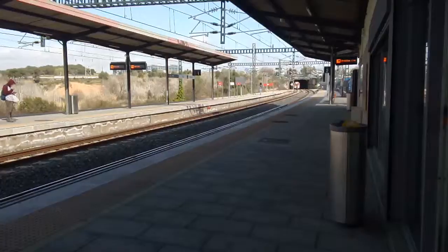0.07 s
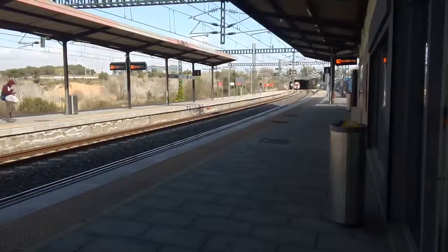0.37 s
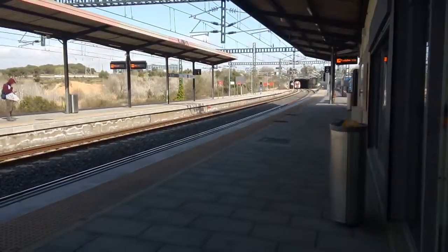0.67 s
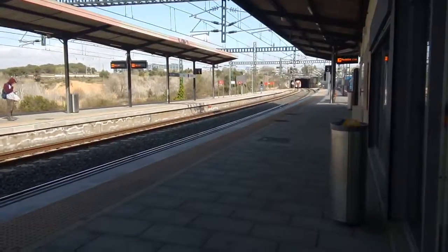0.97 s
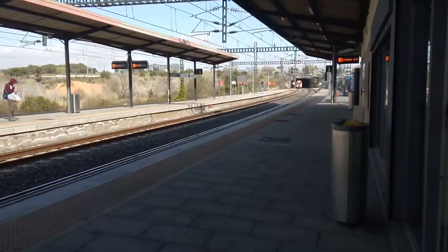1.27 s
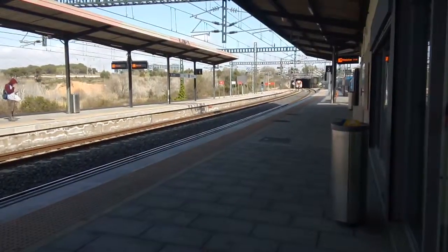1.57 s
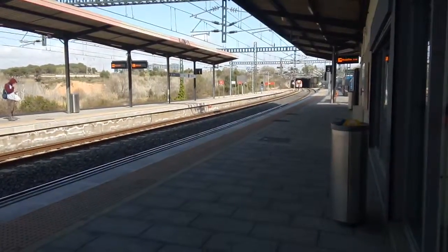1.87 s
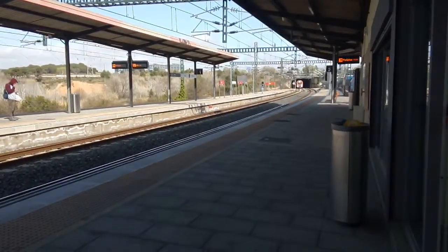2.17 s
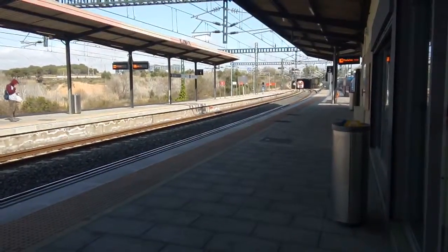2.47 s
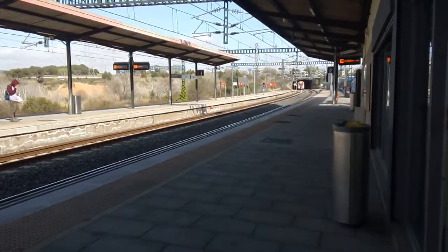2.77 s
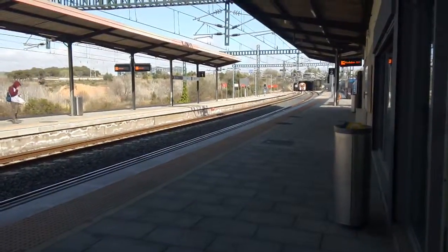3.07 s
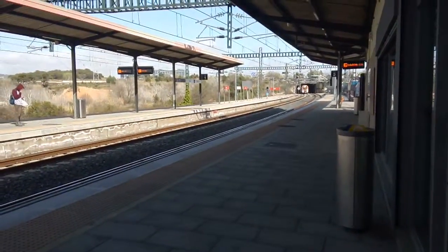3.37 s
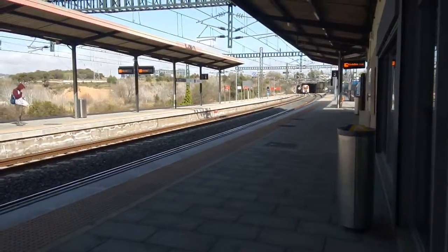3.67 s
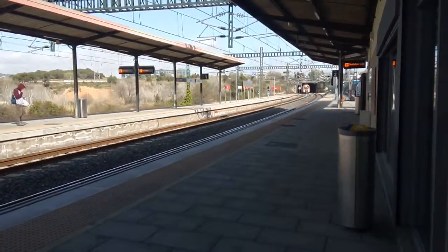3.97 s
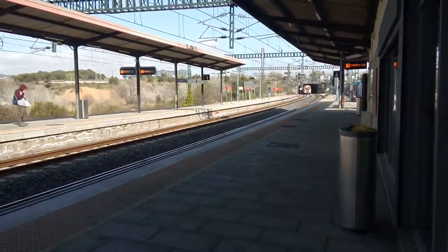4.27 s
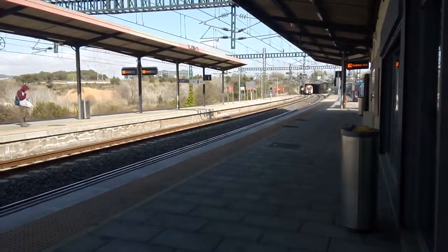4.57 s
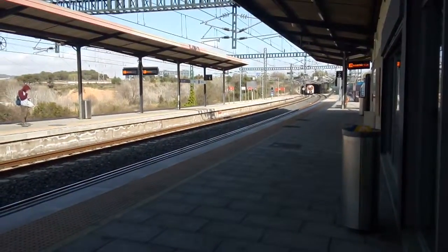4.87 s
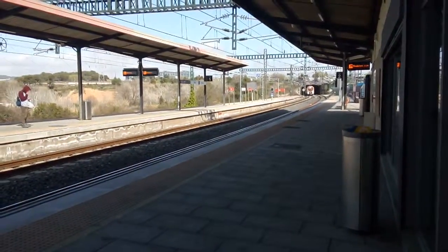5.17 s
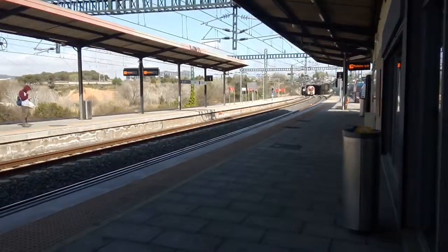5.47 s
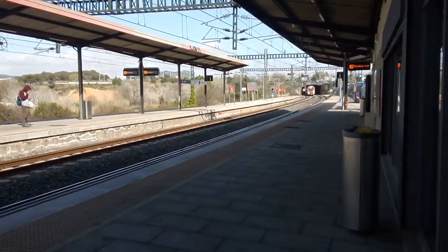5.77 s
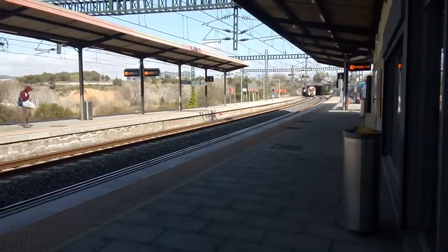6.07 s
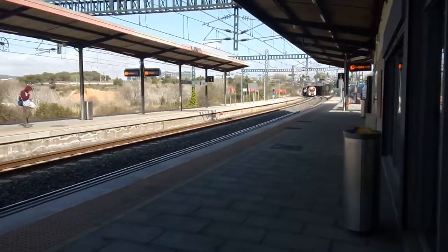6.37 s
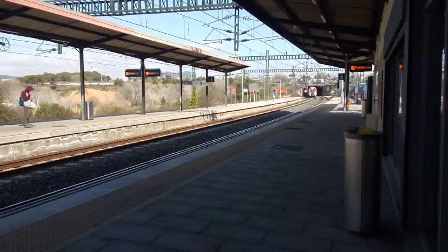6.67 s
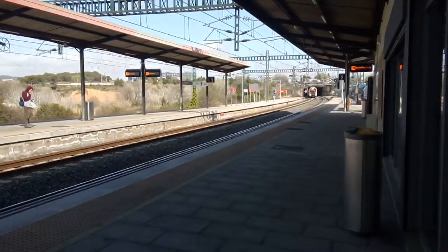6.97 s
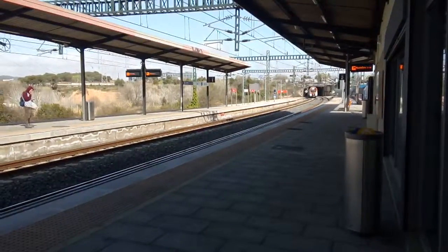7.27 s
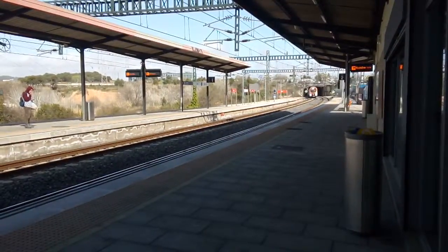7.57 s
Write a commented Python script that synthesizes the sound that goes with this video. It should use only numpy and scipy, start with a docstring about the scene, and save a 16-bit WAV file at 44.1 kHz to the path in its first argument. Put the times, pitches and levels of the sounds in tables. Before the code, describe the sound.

A distant electric commuter train rolls toward an open-air station, heard from the platform. The rails sing and hiss over a low rumble, with a faint high sizzle and a thin whistle that comes and goes. A low drone dies away early. Then the wheels strike a rail joint in small rhythmic groups, each knock arriving as a falling metallic pew that echoes briefly under the canopy and grows louder toward the end.

```python
"""Distant train nearing a platform

An electric commuter train rolls toward an open station. Its wheels strike a rail joint; each knock
runs ahead along the steel, treble first, and arrives as a falling "pew" that echoes under the canopy.
The rails sing, hiss and sizzle over a low rumble. A drone dies away; a thin whistle comes and goes."""
import sys
import numpy as np
from scipy import signal
from scipy.fft import rfft, irfft, next_fast_len
from scipy.io import wavfile
from scipy.ndimage import uniform_filter1d

SR = 44100
rng = np.random.default_rng(int(sys.argv[2]) if len(sys.argv) > 2 else 0)


def dump_mix(stems):
    """Bounce the given channels to the path in sys.argv[1] as a 16-bit WAV at rate SR."""
    frames = np.atleast_2d(stems).T  # one column per channel
    limited = np.clip(frames, -1, 1)  # hard clip at full scale
    pcm = np.round(limited * 32767).astype(np.int16)
    wavfile.write(sys.argv[1], SR, pcm)


N = 335601
TIME = np.arange(N) / SR
FREQ = np.maximum(np.fft.rfftfreq(N, 1 / SR), 1)

# Resonances of the rail on its sleepers. Each row: centre in Hz, width in Hz, strength in dB.
RAIL_RESONANCES = [(361, 17, -3), (411, 15, -0.5), (487, 20, 0.5), (601, 29, -4.5), (736, 13, -12.5),
                   (893, 19, -3.5), (1020, 19, -12), (1080, 8.6, -11), (1349, 8.1, 2)]


def from_db(db):
    """Decibels to gain."""
    return 10 ** (np.asarray(db) / 20)


def unit_rms(x):
    """Scale to unit power."""
    return x / np.sqrt(np.mean(x ** 2) + 1e-20)


def curve(rows):
    """Rows of (seconds, value), interpolated to every sample."""
    return np.interp(TIME, *np.transpose(rows))


def colour(points, freq):
    """Gain from rows of (Hz, dB), joined on a log-frequency axis."""
    hz, db = np.transpose(points)
    return from_db(np.interp(np.log(freq), np.log(hz), db))


def rolloff(ratio, order):
    """Low-pass gain for ratio = freq / corner; high-pass for its inverse."""
    return 1 / (1 + ratio ** order)


def resonances(modes, freq):
    """Flat response plus ringing modes."""
    return 1 + sum(from_db(db) / (1 + 2j * (freq - hz) / width_hz) for hz, width_hz, db in modes)


def noise(response):
    """Unit-power noise with the given frequency response."""
    size = next_fast_len(N)
    gain = np.interp(np.fft.rfftfreq(size, 1 / SR), FREQ, np.abs(response))
    return unit_rms(irfft(rfft(rng.standard_normal(size)) * gain, size)[:N])


def drift(rate_hz, size=2048):
    """Smooth random wander of spread 1, mostly below rate_hz."""
    freq = np.fft.rfftfreq(size, N / SR / size)
    slow = irfft(rfft(rng.standard_normal(size)) * rolloff(freq / rate_hz, 2), size)
    return np.interp(TIME, np.linspace(0, N / SR, size), unit_rms(slow))


def nearing(start_db, db_per_s):
    """Level in dB, rising as the train nears."""
    return start_db + db_per_s * TIME


def swell(at_s, half_s, db):
    """Bell-shaped boost in dB."""
    return db * np.exp(-((TIME - at_s) / half_s) ** 2)


def flicker(x, depth_db, size=1024):
    """Small patches of the spectrum swell and sink, more deeply in the treble; unit power."""
    freq, _, spectrum = signal.stft(x, SR, nperseg=size)
    patches = uniform_filter1d(rng.standard_normal(spectrum.shape), size=3, axis=0)
    patches = unit_rms(uniform_filter1d(patches, size=4, axis=1))
    spread_db = depth_db * np.clip(freq / 4500, 0, 1)[:, None]
    _, flickering = signal.istft(spectrum * from_db(spread_db * patches), nperseg=size)
    return unit_rms(flickering[:N])


def ringing_noise(modes, flicker_db):
    """Flickering noise in a few resonances; unit power."""
    power = sum(from_db(2 * db) / (1 + ((FREQ - hz) / width_hz * 1.3) ** 2) ** 4
                for hz, width_hz, db in modes)
    return flicker(noise(np.sqrt(power)), flicker_db)


def rail_singing(flutter_db):
    """Rough wheel treads keep the rails singing in their pass band, with one swell."""
    # Rolling noise carried ahead. Each row: frequency in Hz, relative density in dB.
    spectrum = [(300, -9), (540, -5.5), (610, -0.5), (900, -1), (1080, 0.5), (1220, -1.5), (1345, 0),
                (1400, -16.5), (1700, -28.5)]
    band = colour(spectrum, FREQ) * rolloff(250 / FREQ, 4) * rolloff(FREQ / 2000, 6)
    singing = noise(band * resonances(RAIL_RESONANCES, FREQ))
    level_db = nearing(start_db=-51, db_per_s=0.35) + swell(at_s=1.07, half_s=0.23, db=3.6)
    return singing * from_db(level_db + flutter_db * drift(4.4))


def rail_hiss(flicker_db):
    """Broad hiss of rails and open air, slowly growing."""
    # Each row: frequency in Hz, relative density in dB.
    spectrum = [(300, 1), (1450, 0.5), (1720, 1.5), (1810, 4), (2100, -0.5), (2700, -2.5), (2870, -6.5),
                (3350, -6.5), (3750, -12), (4800, -17), (5100, -18.5), (5700, -25.5), (6100, -33),
                (7300, -50.5)]
    hiss = noise(colour(spectrum, FREQ) * rolloff(250 / FREQ, 4) * rolloff(FREQ / 8000, 12))
    return flicker(hiss, flicker_db) * from_db(nearing(start_db=-51.5, db_per_s=0.38))


def rail_sizzle():
    """High steel resonances grow as the wheels near; the shimmer above them flares twice."""
    # Two sets of resonances. Each row: centre in Hz, width in Hz, relative level in dB.
    steel_modes = [(4780, 330, -8), (5270, 100, 1), (5445, 120, 1), (5584, 150, 2), (5744, 150, -1)]
    shimmer_modes = [(5830, 290, 3), (6020, 290, 0), (6280, 160, -7), (6400, 230, -7.5), (6870, 450, -13.5)]
    # Envelope of the steel modes. Each row: time in seconds, level in dB.
    steel_levels = [(.3, -77), (1.4, -73), (2.2, -75.5), (2.4, -71), (3.5, -71.5), (7.6, -68)]
    steel = from_db(curve(steel_levels)) * ringing_noise(steel_modes, flicker_db=2.5)
    flares_db = swell(at_s=2.335, half_s=0.03, db=9) + swell(at_s=3.13, half_s=0.06, db=7.5)
    shimmer_db = nearing(start_db=-82.5, db_per_s=0.1) + flares_db
    return steel + from_db(shimmer_db) * ringing_noise(shimmer_modes, flicker_db=4.5)


def rumble(split_hz, deep_flutter_db, upper_gain_db):
    """Airborne roar of train and surroundings: a nearly steady deep part, a wavering upper part."""
    # Each row: frequency in Hz, relative density in dB.
    spectrum = [(20, -27), (30, -18.5), (38, -19.5), (50, -11.5), (68, 2), (84, -2), (101, 0), (118, -1.5),
                (145, 0), (175, -3), (210, -5), (255, -11.5), (300, -13), (450, -25), (900, -36.5)]
    # Upper part, wavering at random. Each row: time in seconds, level in dB before upper_gain_db.
    upper_levels = [(0.35, -53.5), (1.05, -57.5), (1.18, -50.5), (1.82, -55.5), (2.15, -48.5),
                    (2.21, -54.5), (2.45, -51.5), (3.8, -48), (5.11, -51.5), (5.38, -49), (7.6, -51)]
    shape = colour(spectrum, FREQ) * rolloff(FREQ / 1000, 4)
    deep_share = rolloff(FREQ / split_hz, 8)
    deep_db = nearing(start_db=-54.5, db_per_s=0.14) + deep_flutter_db * drift(1.9)
    deep = from_db(deep_db) * noise(shape * np.sqrt(deep_share))
    upper = from_db(curve(upper_levels) + upper_gain_db) * noise(shape * np.sqrt(1 - deep_share))
    return deep + upper


def drone(level_db, hold_s, release_db_per_s, waver, flutter_db):
    """Low, slightly unsteady tones hold, then sink into the rumble."""
    # Each row: frequency in Hz, relative level in dB.
    partials = [(69.3, 0), (101, -5.5), (245, -12.5)]
    tones = np.zeros(N)
    for hz, db in partials:
        gain = from_db(db + flutter_db * drift(2.7))
        pitch_hz = hz * (1 + waver * drift(1.8))
        tones += gain * np.sin(2 * np.pi * np.cumsum(pitch_hz) / SR)
    release_db = release_db_per_s * np.maximum(TIME - hold_s, 0)
    return from_db(level_db - release_db) * unit_rms(tones)


def whistle(full_hz, loss_db_per_khz, waver, jitter, flutter_db):
    """A thin, ragged tone wanders in pitch and weakens as it sinks below full_hz."""
    # Four phrases, each a list of rows. Each row: time in seconds, pitch in Hz.
    phrases = [
        [(.34, 4500), (.45, 4700), (.49, 5000), (.54, 4980), (.58, 4540), (.615, 4600), (.68, 4100)],
        [(.75, 4400), (.795, 4580), (.84, 4350), (.91, 4720), (.94, 4470), (1.03, 4730), (1.13, 4290),
         (1.205, 4550), (1.29, 4250), (1.41, 4480)],
        [(4.03, 4300), (4.17, 4540), (4.215, 4800), (4.235, 4710), (4.285, 4940), (4.34, 4800), (4.42, 4580),
         (4.455, 4770), (4.53, 4400)],
        [(7.19, 4530), (7.24, 4860), (7.31, 4700), (7.37, 5060), (7.4, 5080), (7.45, 4660), (7.56, 4560),
         (7.61, 4640)],
    ]
    out = np.zeros(N)
    for rows in phrases:
        pitch_hz = curve(rows) * (1 + waver * drift(25))
        sag_khz = np.maximum(full_hz - pitch_hz, 0) / 1000
        level_db = nearing(start_db=-66, db_per_s=0.4) - loss_db_per_khz * sag_khz
        ragged_hz = pitch_hz * (1 + jitter * drift(140, size=4096))
        tone = np.sqrt(2) * np.sin(2 * np.pi * np.cumsum(ragged_hz) / SR)
        sounding = (TIME > rows[0][0]) & (TIME < rows[-1][0])
        gate = uniform_filter1d(sounding.astype(float), size=400)
        out += gate * from_db(level_db + flutter_db * drift(70)) * tone
    return out


def bending_wave(freq, travel_s, shear_hz):
    """Rail response: speed grows as the root of frequency, so lows lag; 1 kHz takes travel_s."""
    # What the rail carries and radiates. Each row: frequency in Hz, gain in dB.
    rail_band = [(310, -24.5), (365, -10), (430, -25), (485, -17.5), (535, -26), (605, -1.5), (645, 3),
                 (685, -2), (735, -1), (900, -1.5), (975, -4.5), (1100, 0), (1165, -22.5), (1250, -17.5),
                 (1340, -9.5), (1400, -35.5), (2200, -50)]
    phase = 4 * np.pi * travel_s * np.sqrt(1000 * np.minimum(freq, shear_hz))
    # Shear caps the speed: everything above shear_hz lands at once, as a crisp front.
    phase *= 1 + np.maximum(freq / shear_hz - 1, 0) / 2
    band = colour(rail_band, freq) * rolloff(330 / freq, 8) * rolloff(freq / 2200, 8)
    return np.exp(-1j * phase) * band * resonances(RAIL_RESONANCES, freq)


def twisting_wave(freq, travel_s, centre_hz, width_hz, gain_db):
    """Rail response: a slower, narrow-band torsion wave follows the front."""
    delay = np.exp(-2j * np.pi * freq * travel_s)
    return from_db(gain_db) * delay / (1 + 2j * (freq - centre_hz) / width_hz) ** 2


def platform_echo(size, tail_db, tail_t60_s, late_db, late_t60_s, build_s):
    """Platform response: a few clear paths, scatter under the canopy, a faint long tail."""
    # Rail to listener by ground, platform edge and canopy. Each row: delay in seconds, gain in dB.
    paths = [(0.0, -6), (0.00215, 2), (0.00745, -5.5), (0.0089, -4.5), (0.0121, -4), (0.01455, -6),
             (0.0168, -1.5), (0.0196, -12.5), (0.03885, -7.5), (0.05135, -11.5), (0.0537, -15.5),
             (0.0664, -12.5)]
    t, freq = np.arange(size) / SR, np.fft.rfftfreq(size, 1 / SR)
    clear = sum(from_db(db) * np.exp(-2j * np.pi * freq * delay_s) for delay_s, db in paths)
    decay = from_db(tail_db - 60 * t / tail_t60_s) + from_db(late_db - 60 * t / late_t60_s)
    scatter = rng.standard_normal(size) * decay * np.minimum(t / build_s, 1) ** 2
    return clear + rfft(scatter)


def joint_knocks(travel_s, gap_s, gain_db, neutral_db, size=32768):
    """Each wheel on the joint sends the same falling sweep down the rail; harder knocks are duller."""
    # Runs of wheels. Each row: first arrival in seconds, list of knock levels in dB before gain_db.
    runs = [(1.939, [-40, -39]), (3.228, [-35.5, -36.5]), (4.521, [-44.5, -38, -37.5]),
            (5.53, [-39.5, -32.5, -33]), (6.543, [-46]), (6.821, [-32, -35, -31, -32.5])]
    freq = np.maximum(np.fft.rfftfreq(size, 1 / SR), 1)
    bending = bending_wave(freq, travel_s, shear_hz=1045.4)
    twisting = twisting_wave(freq, travel_s + 0.039, centre_hz=1326, width_hz=110, gain_db=-14.5)
    echo = platform_echo(size, tail_db=-26.5, tail_t60_s=0.37,
                         late_db=-45.5, late_t60_s=0.98, build_s=0.034)
    sweep = (bending + twisting) * echo
    octaves = np.clip(np.log2(freq / 850), -1, 1)   # tilt spans an octave each side of 850 Hz
    out = np.zeros(N + size)
    for first_s, levels_db in runs:
        for k, db in enumerate(levels_db):
            tilt_db_per_octave = min(0.95 * (neutral_db - db), 7.5)
            knock = irfft(sweep * from_db(tilt_db_per_octave * octaves), size)
            start = round((first_s + k * gap_s - travel_s) * SR)
            out[start:start + size] += from_db(db + gain_db) * unit_rms(knock)
    return out[:N]


def scene():
    """Mono mix at the platform."""
    out = rail_singing(flutter_db=1.15)
    out += rail_hiss(flicker_db=2.0)
    out += rail_sizzle()
    out += rumble(split_hz=113, deep_flutter_db=0.9, upper_gain_db=-0.5)
    out += drone(level_db=-51.5, hold_s=1.8, release_db_per_s=69.5, waver=0.012, flutter_db=1.5)
    out += whistle(full_hz=4770, loss_db_per_khz=22, waver=0.007, jitter=0.006, flutter_db=3.0)
    out += joint_knocks(travel_s=0.118, gap_s=0.258, gain_db=-11.0, neutral_db=-32)
    return out[None]


def record(dry):
    """Add faint electronic hiss, fade in, cut the top."""
    # Each row: time in seconds, gain in dB.
    fade_in = [(.105, -90), (.115, -21), (.16, -11.5), (.25, -4.5), (.36, 0), (.45, 1.5)]
    self_noise = from_db(-86.5) * noise(colour([(100, 1.5), (13800, -1.5), (15000, 4)], FREQ))
    lowpass = signal.ellip(10, 0.1, 70, 15720, fs=SR, output="sos")
    return signal.sosfilt(lowpass, (dry + self_noise) * from_db(curve(fade_in)))


dry = scene()
out = record(dry)
dump_mix(out)
```